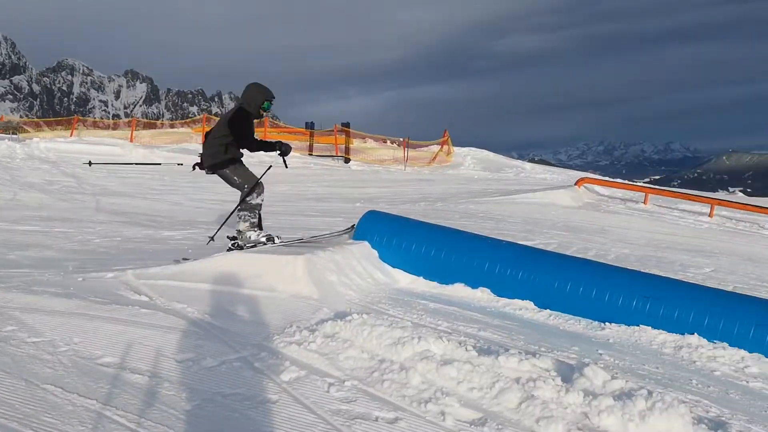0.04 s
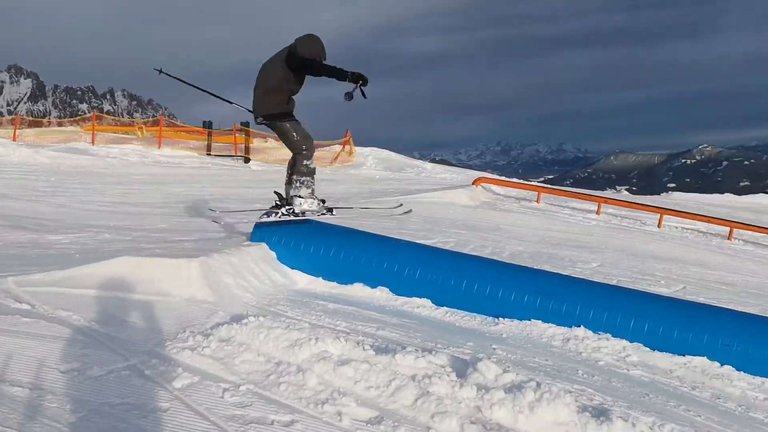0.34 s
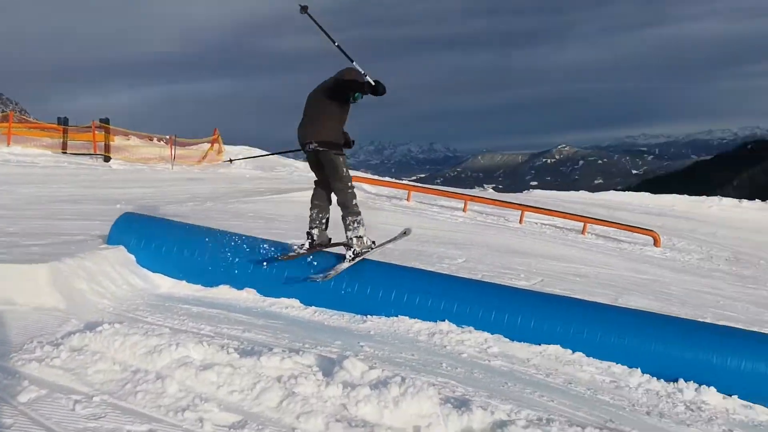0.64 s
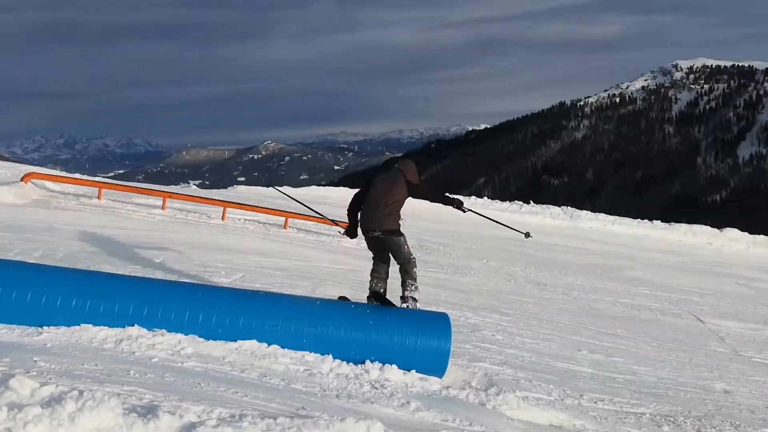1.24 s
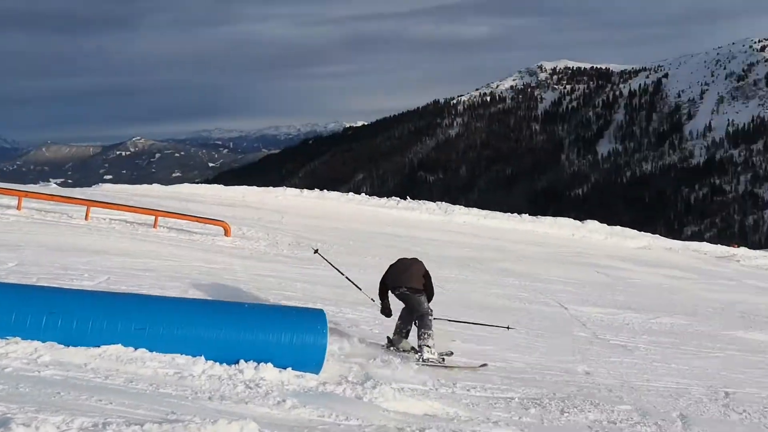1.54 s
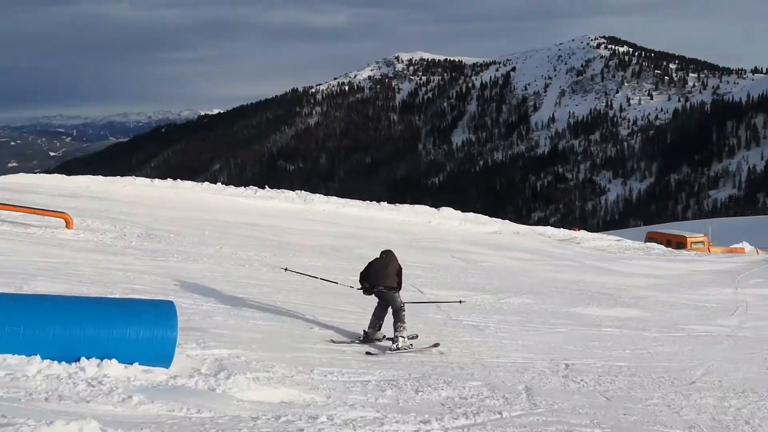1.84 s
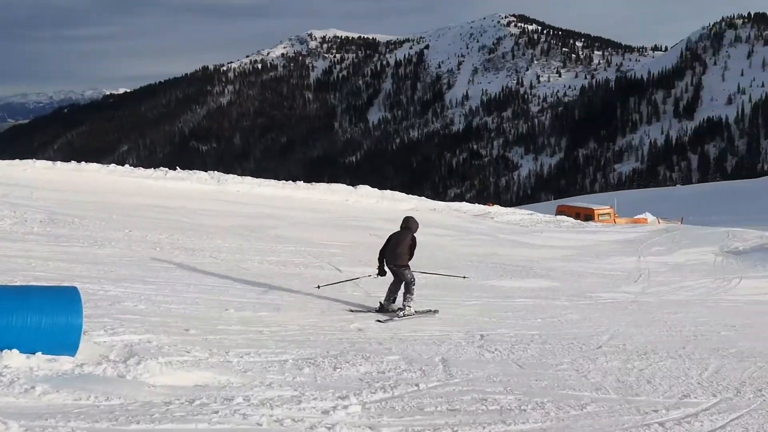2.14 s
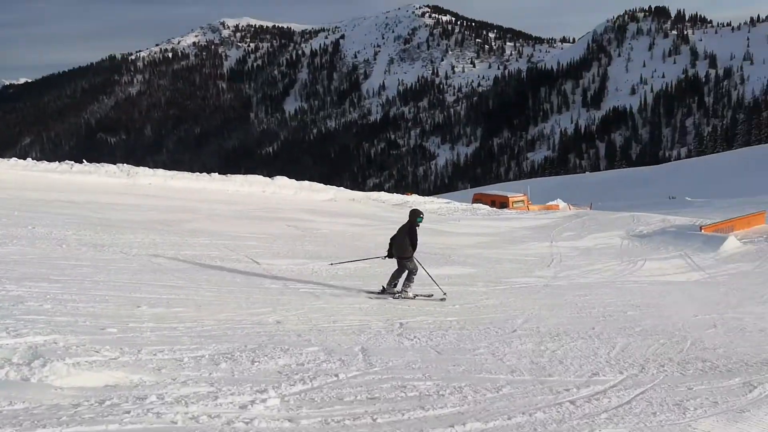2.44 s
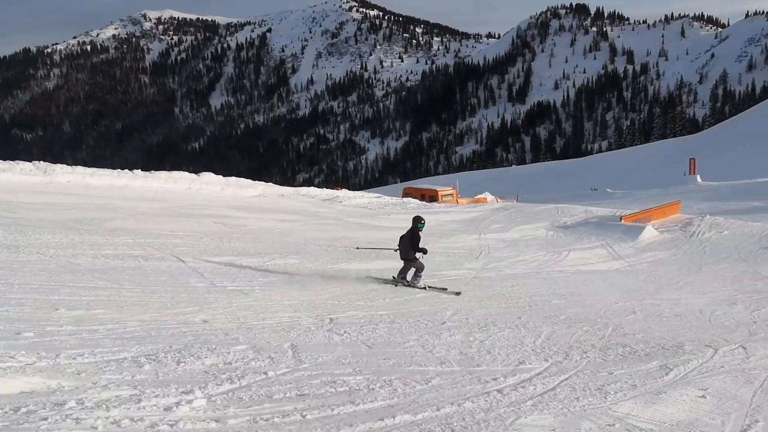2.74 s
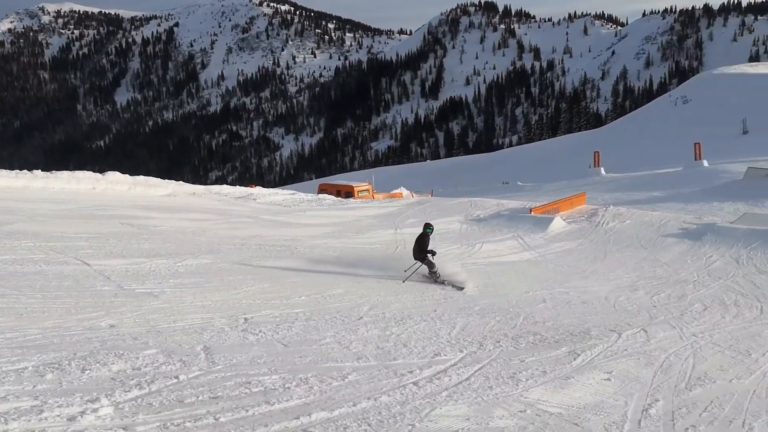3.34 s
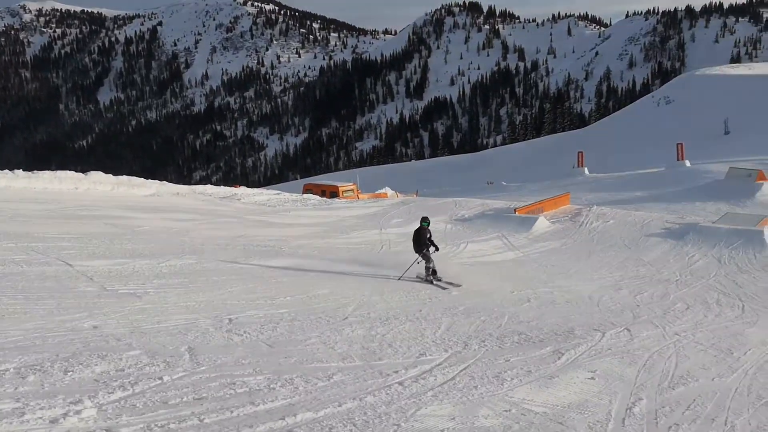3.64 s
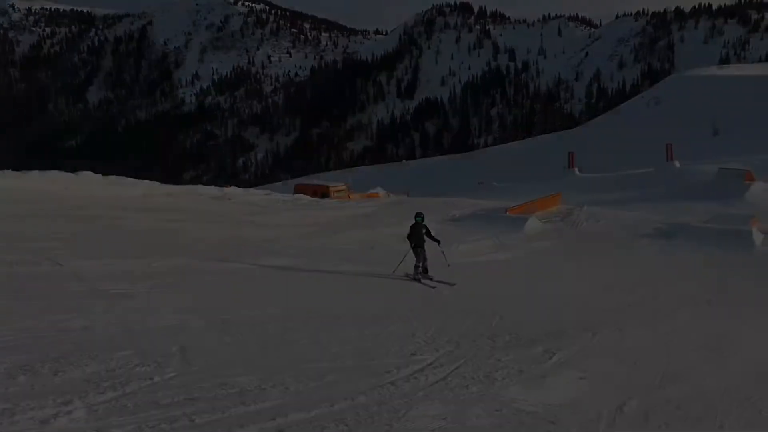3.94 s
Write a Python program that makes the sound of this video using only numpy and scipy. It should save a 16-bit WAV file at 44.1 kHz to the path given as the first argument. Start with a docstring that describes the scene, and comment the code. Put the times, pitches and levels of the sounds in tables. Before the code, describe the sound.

Skis rattle over a hollow ribbed tube, then land and glide on snow, wind buffeting.

```python
"""Skis clatter along a ribbed plastic tube in a snow park: each rib gives a knock and a crack that set ski and
hollow tube ringing, while the edges scrape on the wall. The skis drop into the snow with a thud and hiss away
down the slope, breaking crystals under their edges, with a thin ring, a zing and bright bursts of spray. Gusts
buffet the microphone throughout, with a few sharp pops, over a faint bed of mountain air."""
import sys
import numpy as np
from scipy import signal
from scipy.fft import rfft, irfft
from scipy.io import wavfile
from scipy.ndimage import uniform_filter1d

SR = 44100
rng = np.random.default_rng(int(sys.argv[2]) if len(sys.argv) > 2 else 0)


def output_pcm(signal):
    """Save a mono or channel-first signal as 16-bit PCM at the path in sys.argv[1].

    Samples are clipped to [-1, 1] before scaling.
    """
    pcm = np.clip(np.atleast_2d(signal).T, -1, 1) * 32767
    wavfile.write(sys.argv[1], SR, np.round(pcm).astype(np.int16))


N = 176400
TIME, FREQS = np.arange(N) / SR, np.arange(N // 2 + 1) * SR / N
HIT_SAMPLES = SR // 8

# Tone of still mountain air: f/Hz, level/dB
AIR_COLOUR = [(100, -4), (600, -2), (2000, -29), (7000, -18), (15000, -41.5)]
# Tone of a full gust: f/Hz, level/dB
WIND_COLOUR = [(15, -38.5), (27, 0), (65, -1.5), (125, -4.5), (281, -12), (579, -21.5), (1030, -32.5),
               (1700, -39), (2550, -51.5), (2950, -58), (4550, -75.5), (7700, -120)]
# Deep wind rumble on the microphone: t/s, level/dB
RUMBLE = [(0.0, -42.5), (0.12, -10.5), (0.17, -29), (0.27, -13), (0.3, -28.5), (0.44, -17), (0.46, -25),
          (0.63, -13.5), (0.75, -24), (0.81, -14.5), (0.93, -30.5), (1.02, -21), (1.17, -43), (1.37, -37),
          (1.48, -23.5), (1.59, -34), (1.67, -23.5), (1.77, -31), (1.82, -19.5), (1.99, -27.5),
          (2.08, -14.5), (2.19, -26.5), (2.32, -15.5), (2.67, -17.5), (2.78, -18), (3.04, -14), (3.31, -16),
          (3.98, -20)]
# Strength of the gusts: t/s, level/dB
GUSTS = [(0, -21.5), (.02, -23.5), (.075, -30.5), (.095, -23), (.128, -24), (.15, -38), (.2, -27.5),
         (.27, -23.5), (.34, -24), (.37, -21), (.45, -24), (.48, -32), (.56, -25), (.66, -24), (.7, -32.5),
         (.76, -26), (.82, -21), (.87, -40.5), (.94, -40), (.962, -26), (1.0, -50), (1.08, -50),
         (1.39, -55.5), (1.44, -37), (1.53, -37), (1.57, -78), (1.76, -60), (1.8, -39), (1.88, -22.5),
         (1.98, -45.5), (2.03, -42), (2.065, -24), (2.15, -29.5), (2.19, -49), (2.3, -42), (2.345, -20),
         (2.42, -19), (2.5, -17.5), (2.52, -21.5), (2.655, -24), (2.675, -18), (2.71, -21.5), (2.76, -18.5),
         (2.88, -21), (3.03, -18), (3.18, -22), (3.29, -18), (3.34, -20), (3.39, -18.5), (3.55, -19.5),
         (3.8, -22), (3.98, -23)]
# How hard each band rides the gusts: f/Hz, swing/(dB per dB of gust)
GUST_SWING = [(150, 0.61), (350, 1.42), (700, 1.74), (1500, 2.5), (3000, 2.5)]
# Fader on the wind's treble: t/s, level/dB
WIND_TREBLE = [(0, -4.5), (.4, -3), (.5, -10.5), (.57, -2), (.82, -3.5), (1.9, -6), (2.3, -14),
               (2.45, -1.5), (3.1, -0.5), (3.45, 0.5), (3.9, 4)]
# Fast flutter of the wind: f/Hz, depth/dB
FLUTTER = [(60, 0), (150, 3.5), (300, 1), (700, 5), (2500, 6.5)]
# Stereo balance of the wind: f/Hz, left minus right/dB
WIND_PAN = [(60, 0.5), (180, -1.5), (350, -3), (700, -7.5), (1400, -13.5), (3000, -16)]
# Stereo likeness of the wind: f/Hz, correlation (1 is mono)
WIND_LIKENESS = [(40, 1), (180, 0.88), (700, 0.83), (1400, 0.17), (3000, 0.048)]
# Pops on the microphone: t/s, level/dB, left minus right/dB, half width/s
POPS = [(0.3166, -19, 26.5, 0.00013), (0.736, -11.5, 15.5, 0.00013), (3.6985, -23.5, -21, 0.00022),
        (3.701, -11.5, -17.5, 0.00021)]
# Ring of skis gliding on hard snow: t/s, level/dB
GLIDE_RING = [(0, -64.5), (.5, -86), (1.9, -62), (2.1, -67), (2.55, -61), (2.95, -55), (3.3, -57),
              (3.8, -75.5)]
# An edge biting and zinging, then bright bursts of spray: t/s, level/dB, half length/s, f/Hz, width/Hz
BITES_AND_SPRAYS = [(1.24, -50, 0.039, 5000, 300), (1.725, -50, .035, 6100, 1200), (2.012, -46, 0.015, 6040, 900)]
# Edges shaving snow and frost: t/s, level/dB, left minus right/dB
HISS = [(0, -61, -9.5), (.28, -69, -9.5), (.4, -73, -7), (.585, -88, 14), (.61, -59.5, -15), (.71, -42, 3),
        (.76, -53.5, 11), (.87, -46, 9), (1.02, -42.5, 17), (1.1, -46.5, 6), (1.28, -43, 19.5),
        (1.36, -52.5, 14), (1.42, -57, 14), (1.46, -49.5, 19), (1.51, -57, 13), (1.6, -49, 10),
        (1.7, -45.5, 11), (1.9, -50.5, 7), (1.98, -48.5, 11), (2.01, -50, 15.5), (2.07, -58, 16.5),
        (2.3, -55, 10), (2.5, -58.5, 11), (2.75, -49, 11.5), (2.85, -53, 9), (2.93, -46.5, 13.5),
        (3.08, -50, 12.5), (3.27, -43.5, 11.5), (3.5, -54.5, 13), (3.7, -63.5, 18.5), (3.95, -76, 13)]
# Tone of the hiss on the left: f/Hz, level/dB
HISS_LEFT = [(350, 4.5), (600, -4), (1150, 2.5), (1350, -6), (1700, 2.5), (2700, 2.5), (4000, -1),
             (5200, 2), (6600, 5.5), (7700, 3.5), (8300, -7.5), (11000, -20.5), (15000, -26)]
# Tone of the hiss on the right: f/Hz, level/dB
HISS_RIGHT = [(350, 13), (650, 4.5), (1200, 4), (1500, 11.5), (1900, 16.5), (2700, 2.5), (3900, 8),
              (6200, 3), (7600, 8.5), (8250, 1.5), (9600, 1.5), (11000, -8), (15000, -15.5)]
# Body of the hiss, fullest as the skis dig in after landing: t/s, level/dB
HISS_BODY = [(0, 2), (.6, 3.5), (1.4, 4.5), (1.65, 5), (1.9, 5.5), (2.1, -4), (3.9, 3.5)]
# Skis landing in snow: t/s, level/dB, f/Hz
THUDS = [(1.436, -17, 140), (1.4831, -4, 156), (1.497, -29, 80), (1.532, -13.5, 143)]
# Tone of packed snow crunching: f/Hz, level/dB
CRUNCH_COLOUR = [(150, 12), (400, 2), (900, -8.5), (2000, -13.5), (6000, -22), (12000, -55)]
# Standing waves in the hollow tube: f/Hz, level/dB
HOLLOW_MODES = [(800, 0), (1090, -11.5), (1240, -10.5), (1602, -10), (1759, 0), (2370, -1.5), (2704, 1),
                (3247, -5.5)]
# Resonances of ski and tube wall: f/Hz, width/Hz, level/dB
WALL_MODES = [(1100, 150, -0.5), (1566, 85, 3.5), (1760, 190, 4.5), (2560, 230, -5), (3276, 200, 2.5),
              (3870, 310, -5), (4800, 1200, -12), (6600, 800, -7)]
# Scrape as the skis press on the tube: t/s, level/dB
SCRAPE = [(.585, -85), (.6, -53), (.7, -29.5), (.76, -45.5), (.87, -34.5), (.96, -36), (1.08, -38),
          (1.12, -31), (1.23, -37.5), (1.29, -32), (1.35, -41), (1.41, -74), (1.47, -35), (1.52, -74)]
# Flexing of a struck ski: multiple of the knock's pitch, level/dB, t60/s
SKI_MODES = [(.33, -36.5, 0.063), (.6, -29, 0.072), (0.799, -14, 0.046), (1.2, -14.5, 0.059),
             (1.62, -13.5, 0.019)]
# Tone of an edge cracking on a rib: f/Hz, level/dB
CRACK_COLOUR = [(300, -18), (700, -2), (1100, 3), (2700, 14), (4000, 1.5), (4900, 5), (7000, 0.5),
                (8500, -19), (15000, -43)]
# Skis hitting the ribs: t/s, knock level/dB, crack level/dB, knock's left minus right/dB, f/Hz
KNOCKS = [(0.5933, -17, -25, -6, 1610), (0.625, -16.5, -28, -2, 1350), (0.651, -20, -54, -3, 1730),
          (0.691, -20.5, -39, -3, 1610), (0.816, -23.5, -38, 1, 1570), (0.8636, -18, -23, -1, 1650),
          (0.893, -27, -44, 3, 1540), (0.9238, -21, -25.5, 10.5, 1710), (0.9819, -8, -23, -1, 1587),
          (1, -22, -37, 2, 1520), (1.021, -16.5, -45, -1, 1580), (1.041, -20.5, -31.5, 7.5, 1590),
          (1.075, -26, -25, 3, 1770), (1.1042, -10.5, -16, 6, 1284), (1.124, -15.5, -22.5, 13.5, 1320),
          (1.144, -12.5, -15.5, 4, 1530), (1.1652, -17.5, -18.5, 6.5, 1450), (1.1855, -19, -29, 9.5, 2300),
          (1.2026, -14, -22, 1, 1620), (1.2062, -19.5, -22.5, 9.5, 1404), (1.2293, -19, -22.5, 2, 1710),
          (1.2681, -28, -22.5, 12.5, 1570), (1.283, -23.5, -31.5, 15, 2270), (1.3007, -20, -20.5, 1, 1850),
          (1.3354, -21, -16.5, 2, 1630), (1.3743, -30, -19, 1.5, 1740)]


def from_db(db):
    """Decibels to gain."""
    return 10 ** (np.asarray(db) / 20)


def rms_one(x):
    """Scale to unit power."""
    return x / np.sqrt(np.mean(x ** 2) + 1e-20)


def in_time(rows):
    """Each column of an automation curve at every sample."""
    times, *columns = np.transpose(rows)
    return [np.interp(TIME, times, column) for column in columns]


def at_hz(points, hz):
    """Read a table on a log-frequency axis."""
    f, value = np.transpose(points)
    return np.interp(np.log(np.maximum(hz, 1)), np.log(f), value)


def colour(x, spectrum):
    """EQ a steady noise."""
    return irfft(rfft(x) * from_db(at_hz(spectrum, FREQS)), N)


def noise(spectrum, shape=(2, N)):
    """Coloured noise at unit power, stereo by default."""
    return rms_one(colour(rng.standard_normal(shape), spectrum))


def drift(rate_hz):
    """Smooth random modulation with spread 1."""
    count = N // 40
    spectrum = rfft(rng.standard_normal(count)) / (1 + (FREQS[:count // 2 + 1] / rate_hz) ** 2)
    return np.interp(TIME, np.linspace(0, TIME[-1], count), rms_one(irfft(spectrum, count)))


def grains(per_s, spread_db):
    """Random tiny clicks of uneven size."""
    sizes = from_db(spread_db * np.minimum(rng.exponential(1, N), 5)) * rng.choice([-1, 1], N)
    return rms_one(sizes * (rng.random(N) < per_s / SR))


def filtered(x, hz, kind="low", order=2):
    """Low-pass, or band-pass between two corners."""
    return signal.sosfilt(signal.butter(order, hz, kind, fs=SR, output="sos"), x)


def resonant_noise(hz, width_hz):
    """Stereo noise ringing in one resonance."""
    peak = signal.iirpeak(hz, hz / width_hz, fs=SR)
    return rms_one(signal.lfilter(*peak, rng.standard_normal((2, N))))


def pan(db):
    """Stereo gains; positive leans left."""
    return from_db(np.array([[1], [-1]]) * db / 2)


def lagged(x, lag_s):
    """The same sound a little later."""
    return np.interp(TIME - lag_s, TIME, x)


def add(track, s, sound):
    """Mix a short sound in at its time."""
    start = int(s * SR)
    track[..., start:start + sound.shape[-1]] += sound


def mountain_air(level_db=-70.5):
    """Still air lays a faint, wide bed."""
    return from_db(level_db) * noise(AIR_COLOUR)


def wind(rumble_gain_db=2, gust_gain_db=-11, full_gust_db=-18.5, rumble_below_hz=130, treble_hz=500):
    """Eddies cross the two microphone ports in turn; strong gusts are brighter and flutter in bursts."""
    rumble_db, = in_time(RUMBLE)
    treble_db, = in_time(WIND_TREBLE)
    gust_db, = in_time(GUSTS)
    edges = 20 * 2 ** np.arange(0, 8, .5)  # half octaves
    centres = np.sqrt(edges[1:] * edges[:-1])
    turbulence = noise(WIND_COLOUR, (2, 2, N))
    eddies = drift(rate_hz=163)
    eddies = rms_one(eddies - uniform_filter1d(eddies, size=SR // 25))  # only the quick ones flutter
    eddies = rms_one(np.tanh(eddies))  # the stronger ones all push about equally hard
    out = 0
    for k, hz in enumerate(centres):
        mid, side = filtered(turbulence[k % 2], edges[k:k + 2], "band", order=3)
        alike = at_hz(WIND_LIKENESS, hz)
        pair = np.sqrt((1 + alike) / 2) * mid + np.sqrt((1 - alike) / 2) * side * [[1], [-1]]
        flutter = rms_one(from_db(at_hz(FLUTTER, hz) * eddies))
        if hz < rumble_below_hz:
            db = rumble_gain_db + rumble_db
        else:
            swing_db = at_hz(GUST_SWING, hz) * (gust_db - full_gust_db)
            db = gust_gain_db + swing_db + treble_db * (hz > treble_hz)
        out = out + from_db(db) * flutter * pair * pan(at_hz(WIND_PAN, hz))
    return np.array([lagged(out[0], lag_s=0.00089), out[1]])


def pops(tail_db=-31.5, tail_s=0.0091):
    """A sharp dip in pressure, mostly at one port, with a short rustling tail."""
    out, rustle = 0, noise([(1800, 1.5), (4000, -7), (9000, -23.5)], N)
    for s, db, pan_db, width_s in POPS:
        offset_squared = np.minimum(((TIME - s) / width_s) ** 2, 1e4)
        dip = (offset_squared - 1) / (1 + offset_squared) ** 2
        age = np.clip(TIME - s, 0, .15)
        tail = from_db(tail_db) * rustle * (age > 0) * np.exp(-age / tail_s)
        out = out + from_db(db) * pan(pan_db) * (dip + tail)
    return filtered(out, hz=9500)


def glide(waver_db=2.5, burst_pan_db=6):
    """Hard snow keeps the skis ringing in a narrow band; once an edge bites and zings, and now and then spray
    flares up brightly."""
    ring_db, = in_time(GLIDE_RING)
    out = from_db(ring_db + waver_db * drift(rate_hz=28)) * resonant_noise(hz=3183, width_hz=170)
    for s, db, half_length_s, hz, width_hz in BITES_AND_SPRAYS:
        swell = from_db(db) * np.exp(-((TIME - s) / half_length_s) ** 2)
        out = out + swell * resonant_noise(hz, width_hz) * pan(burst_pan_db)
    return out


def snow_hiss(gain_db=1, swish_db=2.5, flicker_db=1.67, body_below_hz=3400):
    """Countless crystals break under the edges; each band swishes on its own."""
    hiss_db, pan_db = in_time(HISS)
    body_db, = in_time(HISS_BODY)
    crystals = [colour(grains(per_s=11000, spread_db=3.5), tone) for tone in (HISS_LEFT, HISS_RIGHT)]
    out, spectrum = 0, rfft(rms_one(np.array(crystals)))
    edges = np.r_[100, 1000, 1600, np.arange(2200, 8300, 600), 10000, 20000]
    for low, high in zip(edges, edges[1:]):
        band = irfft(spectrum * ((FREQS >= low) & (FREQS < high)), N)
        out = out + band * from_db(swish_db * drift(rate_hz=32) + body_db * (high <= body_below_hz))
    return out * pan(pan_db) * from_db(gain_db + hiss_db + flicker_db * drift(rate_hz=52))


def landing(thud_s=0.0032, crunch_db=-20, crunch_s=0.0052):
    """Tails and bases slap the snow: soft, low pushes of air, each with a dull crunch."""
    push, crush = np.zeros(N), np.zeros(N)
    t = np.arange(-HIT_SAMPLES, HIT_SAMPLES) / SR
    for s, db, hz in THUDS:
        add(push, s + t[0], from_db(db) * np.exp(-(t / thud_s) ** 2) * np.cos(2 * np.pi * hz * t))
        add(crush, s + t[0], from_db(db + crunch_db) * np.exp(-abs(t) / crunch_s))
    return np.array([push, lagged(push, lag_s=0.00048)]) + crush * noise(CRUNCH_COLOUR)


def hollow_ring(x, gain_db=-62, t60_s=0.18):
    """The air in the tube keeps ringing after a blow."""
    t = TIME[:SR // 2]
    modes = sum(from_db(db) * np.sin(2 * np.pi * hz * t) for hz, db in HOLLOW_MODES)
    return from_db(gain_db) * signal.fftconvolve(x, modes * from_db(-60 * t / t60_s))[:N]


def wall_ring(x):
    """Ski and tube wall ring in their resonances; white noise keeps its power."""
    response, t = 0, TIME[:2048]
    for k, (hz, width_hz, db) in enumerate(WALL_MODES):
        envelope = from_db(db) * width_hz * np.exp(-np.pi * width_hz * t)
        response = response + (-1) ** k * envelope * np.cos(2 * np.pi * hz * t)
    response = filtered(response, hz=[730, 8070], kind="band")
    return signal.fftconvolve(x, response / np.linalg.norm(response))[:N]


def scrape(gain_db=-2, judder_db=3.2, stereo_width=0.25):
    """The edges catch and slip densely on the plastic; the right side is darker."""
    pressure_db, = in_time(SCRAPE)
    force = from_db(gain_db + pressure_db + judder_db * drift(rate_hz=70))
    shared, *sides = [grains(per_s=4400, spread_db=2.5) for _ in range(3)]
    left, right = [wall_ring(force * rms_one(shared + stereo_width * own)) for own in sides]
    right = filtered(right, hz=3800)
    return np.array([left + hollow_ring(left), right + hollow_ring(right)]) * pan(db=-0.5)


def ski_ring(hz, t, spread_db=2):
    """The struck ski flexes and rings on; its pitch depends on where the rib meets it."""
    strengths = from_db(spread_db * rng.standard_normal(len(SKI_MODES)))
    return sum(strength * from_db(db - 60 * t / t60_s) * np.sin(2 * np.pi * ratio * hz * t)
               for strength, (ratio, db, t60_s) in zip(strengths, SKI_MODES))


def rib_knocks():
    """Each rib gives a short falling chirp of the wall and an edge crack; ski and tube ring on."""
    knock_gain_db, knock_rise_s, chirp_hz, chirp_s = -2, 0.001, 920, 0.00059
    crack_gain_db, crack_rise_s, crack_decay_s, crack_pan_db = -1.5, 0.00038, 0.0019, 9
    tail_db, tail_t60_s = -4, 0.1
    bodies, cracks, t = np.zeros((2, N)), np.zeros((2, N)), TIME[:HIT_SAMPLES]
    knock_envelope = t / knock_rise_s * np.exp(1 - t / knock_rise_s)
    crack_envelope = (1 - np.exp(-t / crack_rise_s)) * np.exp(-t / crack_decay_s)
    for s, knock_db, crack_db, pan_db, hz in KNOCKS:
        cycles = hz * t + chirp_hz * chirp_s * (1 - np.exp(-t / chirp_s))
        body = knock_envelope * np.sin(2 * np.pi * cycles) + ski_ring(hz, t)
        add(bodies, s, pan(pan_db) * from_db(knock_gain_db + knock_db) * body)
        add(cracks, s, pan(pan_db + crack_pan_db) * from_db(crack_gain_db + crack_db) * crack_envelope)
    out = bodies + cracks * noise(CRACK_COLOUR)
    for channel in out:
        decay = rng.standard_normal(HIT_SAMPLES) * from_db(-60 * t / tail_t60_s)
        diffuse_tail = signal.fftconvolve(channel, decay / np.linalg.norm(decay))[:N]
        channel += hollow_ring(channel) + from_db(tail_db) * diffuse_tail
    return np.array([out[0], lagged(out[1], lag_s=0.0001)])


def scene():
    """Skis and wind over the bed of still air."""
    return mountain_air() + rib_knocks() + scrape() + snow_hiss() + glide() + landing() + wind() + pops()


def record(dry, cutoff_hz=16500):
    """Soft-clip the highest peaks and cut the top end."""
    rounded = dry / (1 + dry ** 8) ** (1 / 8)
    return signal.sosfilt(signal.cheby2(12, 70, cutoff_hz, fs=SR, output="sos"), rounded)


dry = scene()
out = record(dry)
output_pcm(out)
```